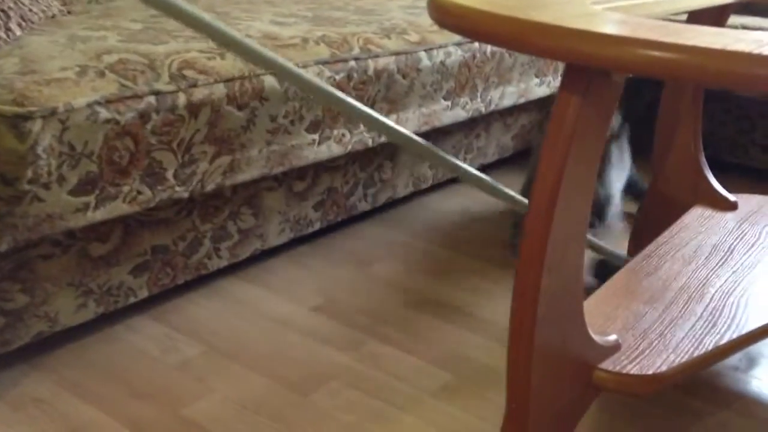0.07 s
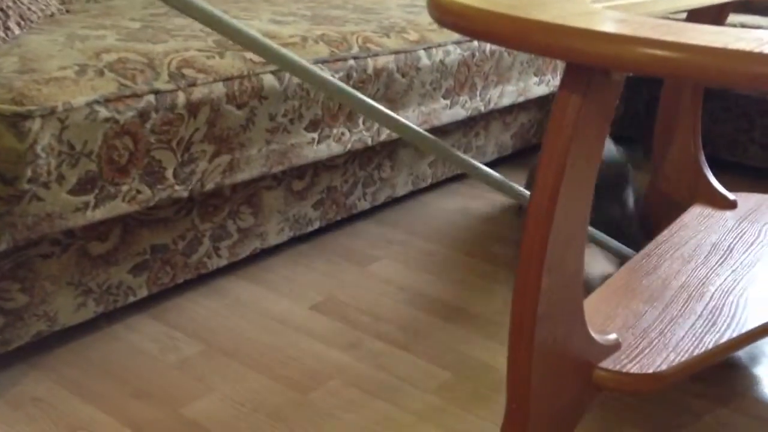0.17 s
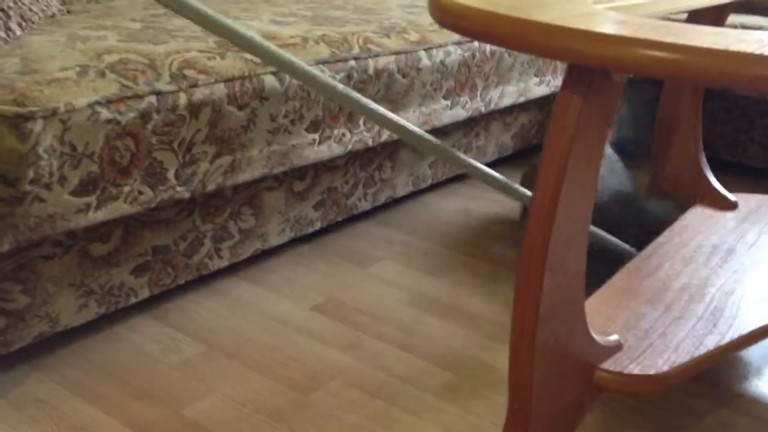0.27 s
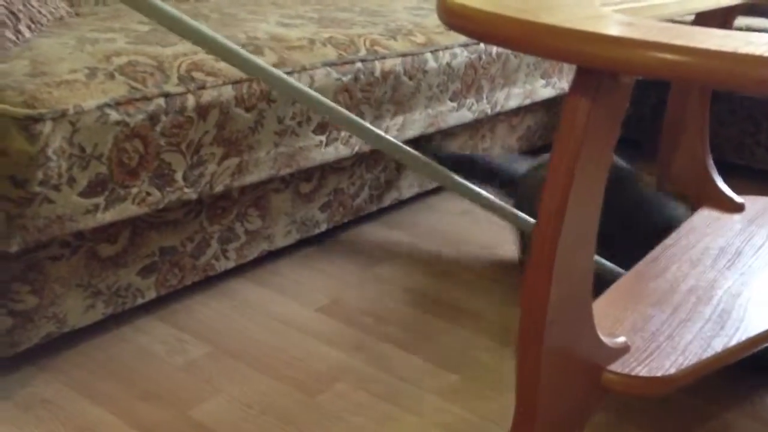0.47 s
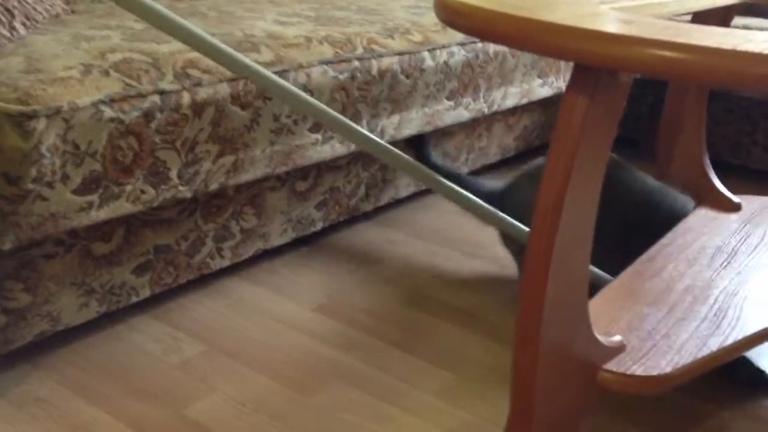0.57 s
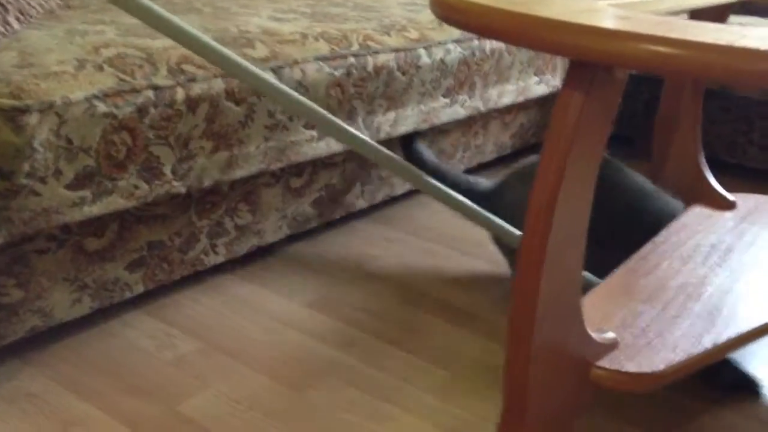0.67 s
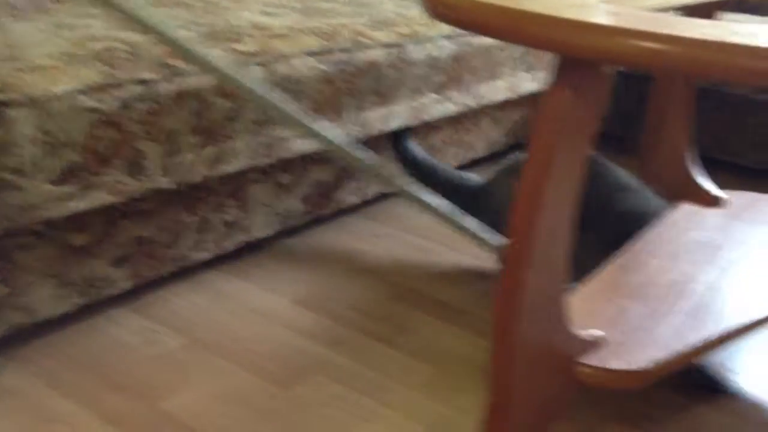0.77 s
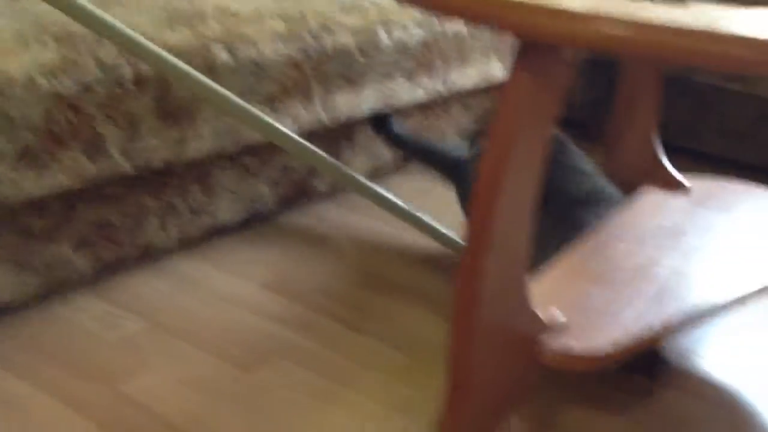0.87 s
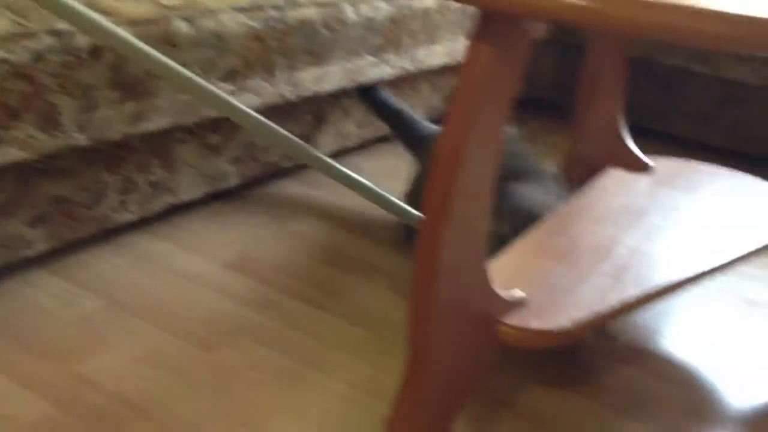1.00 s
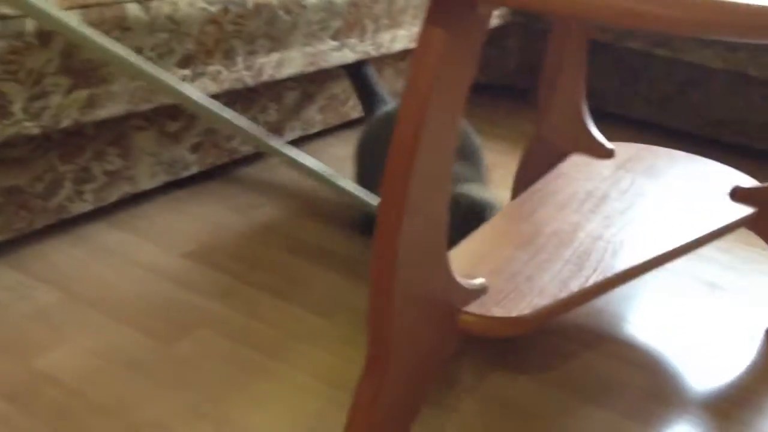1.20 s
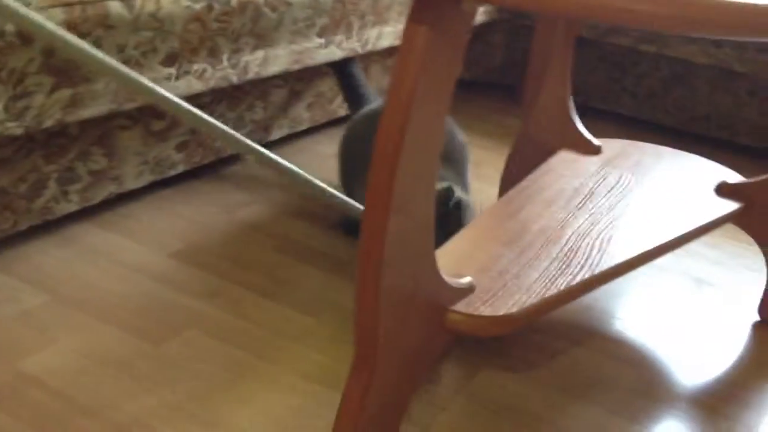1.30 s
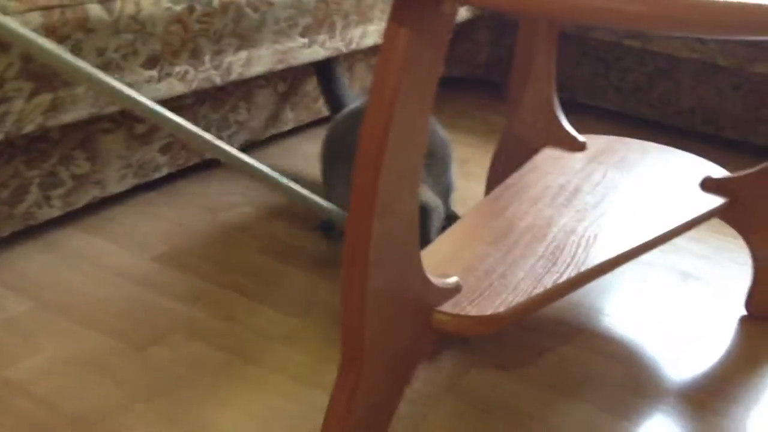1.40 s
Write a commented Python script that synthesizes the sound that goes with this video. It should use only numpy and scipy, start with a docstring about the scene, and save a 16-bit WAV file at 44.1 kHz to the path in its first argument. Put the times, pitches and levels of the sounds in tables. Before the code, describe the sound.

A cat hisses and growls in a living room. Soft bumps on wooden furniture and paw scuffs come in the first 0.4 seconds, with two quick spits around 0.25 and 0.35. The hiss peaks near 0.5 seconds, then darkens into a quieter, rough, wavering growl from 0.6 until about 1.4. Claws tick lightly on the hard floor around 1 second. The room adds a short echo.

```python
"""Soft bumps and paw scuffs come first, as a cornered cat turns against living room furniture.
It spits twice as its breath builds into a hiss: air rushing through the open mouth.
The voice joins in, the mouth closes, and uneven pulses of the vocal folds make a rough growl.
Claws tick on the hard floor. The room adds a short echo and a faint background noise."""
import sys
import numpy as np
from scipy import signal
from scipy.fft import rfft, irfft
from scipy.io import wavfile
from scipy.ndimage import uniform_filter1d

SR = 44100
rng = np.random.default_rng(int(sys.argv[2]) if len(sys.argv) > 2 else 0)


def waveform_to_disk(signal):
    """Save audio, clipped to [-1, 1], as 16-bit WAV at the path in sys.argv[1]."""
    frames = np.transpose(np.atleast_2d(signal))
    scaled = np.clip(frames, -1, 1) * 32767
    samples = np.round(scaled).astype(np.int16)
    wavfile.write(sys.argv[1], SR, samples)


N = 63945
T = np.arange(N) / SR

# the body bumps the furniture and paws land (time [s], level [dB], decay [s])
BUMPS = [(0.013, -58, 0.017), (.07, -59, 0.022), (0.141, -49.5, 0.033), (.165, -44.5, .01),
         (0.234, -32.5, 0.045), (0.26, -20.5, .018), (0.276, -24.5, 0.037), (0.31, -23, 0.032),
         (.338, -27, 0.0087), (.376, -24.5, 0.006), (0.394, -33, 0.011), (0.936, -52.5, 0.034),
         (0.977, -52, .03)]
# tone colour of a thud: how strong its lows and highs are (frequency [Hz], level [dB])
BUMP_COLOUR = [(30, -62), (95, -31), (135, 0.5), (210, -5.5), (270, -8), (370, -16), (600, -18),
               (1200, -24), (2500, -27), (8000, -52.5)]
# ringing notes of the furniture (frequency [Hz], level [dB], time to fade by 60 dB [s])
WOOD_NOTES = [(138.8, -6, 0.23), (180, -6.5, 0.078), (212, -15, 0.26), (357, -4.5, 0.074)]
# paws scuff the floor (time [s], level [dB], rise [s], decay [s])
SCUFFS = [(0.142, -53, 0.00067, 0.022), (.176, -33, 0.00068, 0.02), (.232, -34, 0.0013, 0.037),
          (.311, -30.5, 0.0029, 0.015), (.345, -30.5, 0.012, 0.027), (0.531, -43, 0.0067, 0.018),
          (.785, -49, .01, 0.07), (0.921, -47, 0.02, 0.017)]
# tone colour of a scuff (frequency [Hz], level [dB])
SCUFF_COLOUR = [(200, -11), (700, -8.5), (1100, 6.5), (1500, -4), (2500, -1), (5500, -3.5), (8500, -27),
                (13000, -23.5), (16000, -33)]

OPEN_HZ = 2491  # resonance of the open mouth: the frequency it rings at
RATTLE_HZ, GROWL_RATTLE_DB, HISS_RATTLE_DB = 88.5, 2.5, 1.5  # speed and depth of uneven surges of air
# breath of the hiss (time [s], level [dB], mouth resonance [Hz])
HISS = [(.12, -85, 2400), (.18, -41.5, 2280), (.235, -33.5, 2650), (.28, -27, 2500), (.33, -34.5, 2680),
        (.385, -22, 2315), (.416, -26.5, 2630), (.436, -15.5, 2640), (.462, -15.5, 2430),
        (.482, -23.5, 2224), (.505, -16.5, 2330), (.53, -18, 2140), (.55, -17, 1963), (.575, -23, 1830),
        (.607, -24.5, 1600), (.64, -46, 1450), (.72, -44, 1370), (.8, -90, 1330)]
# tone colour of the hiss with the mouth at OPEN_HZ (frequency [Hz], level [dB])
HISS_COLOUR = [(200, -29.5), (750, -30.5), (1050, -23.5), (1400, -19), (1720, -22.5), (2000, -5),
               (2380, -2), (2850, -4), (3300, -13), (4000, -22.5), (4900, -22), (7000, -39), (8300, -39),
               (9500, -51), (16000, -51)]
# high hiss resonances (open-mouth frequency [Hz], shift with the mouth [Hz/Hz], width [Hz], level [dB])
HISS_HIGHS = [(5650, 0.056, 1150, -22.5), (7950, 1, 630, -29.5)]
# how much of the hiss is voice (time [s], share [0-1])
VOICE_SHARE = [(.42, .02), (.465, .4), (.49, .88), (.52, .88), (.545, .5), (.62, .35)]
# how fast the vocal folds vibrate (time [s], pitch [Hz])
PITCH = [(.44, 317.7), (.48, 317.7), (.522, 328.1), (.555, 298.1), (.59, 302), (.635, 360.3), (.7, 347.1),
         (.76, 335), (.84, 315.5), (.9, 314.8), (.95, 338.5), (1.06, 341.4), (1.13, 329.4), (1.21, 327.6),
         (1.27, 340), (1.35, 309.8), (1.45, 306.9)]
JITTER_HZ = 110  # speed of the random wobble in pitch
# two spits (time [s], level [dB], rise [s], hold [s], decay [s], mouth resonance [Hz])
SPITS = [(0.244, -21, 0.009, .042, 0.0038, 2870), (.34, -18, 0.019, .01, 0.0083, 2600)]
# tone colour of a spit with the mouth at OPEN_HZ (frequency [Hz], level [dB])
SPIT_COLOUR = [(300, -15.5), (1450, -18.5), (1850, -5.5), (2250, -0.5), (2900, 1.5), (3600, -11.5),
               (4700, -15), (5700, -18.5), (7500, -39), (9500, -38), (14000, -42)]
# the voice's two lowest tones (time [s], level at the pitch [dB], level an octave up [dB])
LOW_TONES = [(.42, -86, -59), (.46, -63, -44.5), (.52, -47.5, -38.5), (.56, -52, -43.5), (.62, -59, -63),
             (.67, -63, -54), (.73, -48.5, -76), (.79, -63.5, -63), (.89, -57.5, -54), (.975, -47.5, -92),
             (1.02, -60.5, -57.5), (1.12, -57, -60), (1.28, -56.5, -56), (1.45, -48.5, -47)]
# a second way the folds vibrate, near the octave (time [s], frequency [Hz], level [dB])
SECOND_VIBRATION = [(1.04, 735, -60), (1.095, 738, -51), (1.13, 751.2, -53), (1.22, 714, -59),
                    (1.27, 742, -63), (1.34, 690, -72), (1.45, 684, -56)]

# effort of the growl (time [s], level [dB], mouth resonance [Hz])
GROWL = [(.56, -28.5, 1578), (.61, -29, 1338), (.7, -38, 1409), (.765, -43, 1345), (.85, -42, 1360),
         (.895, -42.5, 1254), (.905, -43.5, 988), (.922, -33.5, 998), (.99, -35.5, 1219),
         (1.018, -46, 1182), (1.06, -39, 1304), (1.11, -33, 1187), (1.16, -37, 1317), (1.188, -41.5, 1218),
         (1.235, -38.5, 1370), (1.278, -32.5, 1412), (1.325, -37, 1205), (1.375, -45, 1137),
         (1.4, -39, 1260), (1.45, -38.5, 1296)]
# resonance of the nose (time [s], frequency [Hz], level relative to the mouth [dB])
NOSE = [(.7, 5300, -45), (.9, 5300, -29), (.94, 5570, -22), (1.02, 5636, -18), (1.11, 4960, -22.5),
        (1.2, 4900, -23), (1.27, 4404, -17), (1.34, 4700, -25), (1.45, 4720, -23)]
# throat resonances that stay put (frequency [Hz], width [Hz], level [dB])
THROAT = [(693, 310, -49), (1100, 510, -14), (2034, 600, -12.5), (9500, 900, -46)]
# throat resonances that slide (multiple of the mouth resonance [ratio], width [Hz], level [dB])
SLIDING_THROAT = [(1.565, 240, -14)]
# tone colour of air leaking past the resonances (frequency [Hz], level [dB])
LEAK_COLOUR = [(150, -10), (500, -11), (1600, -4), (3300, -4), (6500, -10), (8500, -17), (15500, -23.5)]
LEAK_DB, LEAK_FOLLOW = -50, .61  # level at full effort, share of the effort's dB changes it follows
# claws hit the floor (time [s], level [dB], decay [s], ring frequency [Hz])
TICKS = [(0.9326, -41, 0.0015, 3700), (0.964, -31, 0.0015, 4760), (0.9764, -46, .003, 4550),
         (1.0314, -42, 0.0087, 3220), (1.066, -41.5, 0.0057, 2919)]
# tone colour of a claw's crack (frequency [Hz], level [dB])
TICK_COLOUR = [(500, -15), (2500, 2), (3400, -6), (5200, -6), (7000, -8), (15000, -18.5)]

# how long the room rings on (frequency [Hz], time to fade by 60 dB [s])
ROOM_FADE = [(150, 0.36), (1000, 0.48), (3000, 0.34), (12000, 0.31)]
# echoes off floor, table and sofa (delay [s], gain [ratio])
ECHOES = [(.0031, -0.13), (.0058, 0.16), (.0094, -0.067), (0.0133, -0.11)]
# tone colour of the room's background noise (frequency [Hz], level [dB])
BACKGROUND_COLOUR = [(25, -59), (85, -38), (140, 0.5), (240, 2.5), (350, 4), (520, -12), (1000, -13.5),
                     (2200, -16.5), (5000, -8.5), (8000, -18.5), (15500, -19.5)]
TAIL_DB, BACKGROUND_DB = -6.5, -61.5
LOW_CUT_HZ, HIGH_CUT_HZ, BASS_LEAK_DB = 121, 15450, -14


def amp(db):
    """Turns decibels into a gain to multiply by."""
    return 10 ** (np.asarray(db) / 20)


def unit(x):
    """Scales a signal to an average strength (rms) of 1."""
    return x / np.sqrt(np.mean(x ** 2) + 1e-20)


def steady(x, size=900):
    """Keeps the strength near 1 all along, averaging over `size` samples."""
    power = uniform_filter1d(uniform_filter1d(x ** 2, size), size)
    return x / np.sqrt(abs(power) + 1e-14)


def curves(rows):
    """Joins the rows of a time table with straight lines, one curve per column."""
    times, *columns = np.transpose(rows)
    return [np.interp(T, times, column) for column in columns]


def look_up(table, hz):
    """Reads between the rows of a frequency table, on a log scale."""
    frequencies, values = np.transpose(table)
    return np.interp(np.log(hz + 1), np.log(frequencies + 1), values)


def add(mix, start, sound):
    """Mixes a sound in at a start time in seconds."""
    part = mix[max(round(start * SR), 0):][:len(sound)]
    part += sound[:len(part)]


def colour(x, table):
    """Gives a signal the tone colour in a table."""
    gain = amp(look_up(table, np.fft.rfftfreq(2 * N, 1 / SR)))
    return irfft(rfft(x, 2 * N) * gain)[:N]


def noise(table):
    """Noise of strength 1 with the given tone colour."""
    return unit(colour(rng.standard_normal(N), table))


def wander(hz):
    """A random wobble, with speeds up to about `hz`."""
    keep_slow = np.exp(-(np.fft.rfftfreq(N, 1 / SR) / hz) ** 2)
    return unit(irfft(rfft(rng.standard_normal(N)) * keep_slow, N))


def resonate(x, hz, width):
    """Lets through a band `width` Hz wide around a frequency that may move."""
    spin = np.exp(2j * np.pi * np.cumsum(hz * np.ones(N)) / SR)
    r = np.exp(-np.pi * width / SR)
    # shift the band down to 0 Hz, smooth it, shift it back
    smoothed = signal.lfilter([(1 - r) ** 2], [1, -2 * r, r * r], x / spin)
    return 2 * (spin * smoothed).real


def strike(rise, decay, hold=0):
    """A loudness shape that rises, holds and dies away; times in seconds."""
    return np.minimum(T / rise, 1) * np.exp(-np.maximum(T - rise - hold, 0) / decay)


def bumps():
    """Each soft blow makes a dull thud and sets the wood ringing briefly."""
    out = np.zeros(N)
    ring = sum(amp(db - 60 * T / fade) * np.sin(2 * np.pi * hz * T) for hz, db, fade in WOOD_NOTES)
    for start, db, decay in BUMPS:
        thud = steady(noise(BUMP_COLOUR), size=400) * strike(rise=.0027, decay=decay)
        add(out, start, amp(db) * (thud + ring))
    return out


def paw_scuffs():
    """Paws rub the floor in short bursts of grainy noise."""
    out = np.zeros(N)
    for start, db, rise, decay in SCUFFS:
        grainy = unit(noise(SCUFF_COLOUR) * amp(3.4 * wander(hz=540)))
        add(out, start, amp(db) * grainy * strike(rise, decay))
    return out


def count_cycles(hz, jitter, speed=JITTER_HZ):
    """Counts the cycles of a vibration whose pitch wobbles by the fraction `jitter`."""
    return np.cumsum(hz * (1 + jitter * wander(speed))) / SR


def vocal_folds(jitter, air_share):
    """The folds open once a cycle, giving a buzzy pulse and a puff of air."""
    cycles = count_cycles(curves(PITCH)[0], jitter)
    # harmonics (multiples of the pitch) from the third up; k * k smears each pulse over its cycle
    pulses = unit(sum(np.cos(2 * np.pi * (k * cycles + k * k / 36)) for k in range(3, 36)))
    puff_shape = .5 + np.exp(-(cycles % 1) / .45)
    puffs = unit(puff_shape * rng.standard_normal(N))
    return np.sqrt(1 - air_share) * pulses + np.sqrt(air_share) * puffs


def hiss():
    """Air, joined by the voice, rushes through the mouth and sounds darker as it closes."""
    level, mouth_hz = curves(HISS)
    share = curves(VOICE_SHARE)[0]
    voice = vocal_folds(jitter=.007, air_share=.03)
    breath = np.sqrt(1 - share) * rng.standard_normal(N) + np.sqrt(share) * voice
    # colour each short slice to suit the mouth at that moment
    hz, times, slices = signal.stft(breath, SR, nperseg=512, noverlap=384)
    gain = amp(look_up(HISS_COLOUR, hz[:, None] * OPEN_HZ / np.interp(times, T, mouth_hz)))
    air = signal.istft(slices * gain, SR, nperseg=512, noverlap=384)[1][:N]
    for high_hz, shift, width, db in HISS_HIGHS:
        air += amp(db) * resonate(rng.standard_normal(N), high_hz + shift * (mouth_hz - OPEN_HZ), width)
    rattle = amp(HISS_RATTLE_DB * wander(RATTLE_HZ))
    return amp(level) * steady(air * rattle, size=600)


def spits():
    """Two sudden puffs of air burst from the open mouth before the hiss peaks."""
    out = np.zeros(N)
    for start, db, rise, hold, decay, mouth_hz in SPITS:
        air = noise([(hz * mouth_hz / OPEN_HZ, level) for hz, level in SPIT_COLOUR])
        rattle = amp(HISS_RATTLE_DB * wander(RATTLE_HZ))
        add(out, start, amp(db) * steady(air * rattle, size=500) * strike(rise, decay, hold))
    return out


def moan():
    """The folds hum two clear low tones; later a second vibration splits the upper one."""
    cycles = count_cycles(curves(PITCH)[0], jitter=.0217)
    tones = sum(amp(db + 2.3 * wander(hz=50)) * np.sin(2 * np.pi * k * cycles)
                for k, db in enumerate(curves(LOW_TONES), 1))
    split_hz, split_db = curves(SECOND_VIBRATION)
    split = amp(split_db) * np.sin(2 * np.pi * count_cycles(split_hz, jitter=.015))
    return np.sqrt(2) * (tones * (T > LOW_TONES[0][0]) + split * (T > SECOND_VIBRATION[0][0]))


def growl():
    """Uneven, rattling pulses from the folds ring the mouth, nose and throat; some air leaks past."""
    level, mouth_hz = curves(GROWL)
    nose_hz, nose_db = curves(NOSE)
    rattle = amp(GROWL_RATTLE_DB * wander(RATTLE_HZ))
    buzz = vocal_folds(jitter=.022, air_share=.5) * rattle
    voice = resonate(buzz, mouth_hz, width=457)
    voice += amp(nose_db) * resonate(buzz, nose_hz, width=600)
    voice += sum(amp(db) * resonate(buzz, hz, width) for hz, width, db in THROAT)
    voice += sum(amp(db) * resonate(buzz, ratio * mouth_hz, width) for ratio, width, db in SLIDING_THROAT)
    # the narrow centre of the mouth resonance almost whistles
    whistle = unit(np.sin(2 * np.pi * count_cycles(mouth_hz, jitter=.018, speed=120)) * rattle)
    voice = amp(level) * steady(steady(voice) + amp(-1) * whistle)
    leak = amp(LEAK_DB + LEAK_FOLLOW * (level - level.max())) * unit(colour(buzz, LEAK_COLOUR))
    return (voice + leak) * (T > GROWL[0][0])


def claw_ticks():
    """A claw hits the hard floor with a tiny crack and a high ring."""
    out = np.zeros(N)
    for start, db, decay, hz in TICKS:
        ring = steady(resonate(rng.standard_normal(N), hz, width=1800), size=200)
        crack = amp(-5) * noise(TICK_COLOUR)
        add(out, start, amp(db) * (ring + crack) * strike(rise=.0012, decay=decay))
    return out


def room(x, gap=22, count=1200):
    """Nearby surfaces send back a few echoes; many more, about `gap` samples apart, blur into a tail."""
    bounces = np.zeros(gap * (count + 12))
    arrivals = gap * (np.arange(count) + 10) + rng.integers(0, gap, count)
    bounces[arrivals] = rng.choice([-1., 1.], count)
    hz, times, slices = signal.stft(bounces, SR, nperseg=256)
    fade = amp(-60 * times / look_up(ROOM_FADE, hz)[:, None])
    tail = signal.istft(slices * fade, SR, nperseg=256)[1]
    response = amp(TAIL_DB) * tail / np.linalg.norm(tail)
    response[0] += 1  # the sound that arrives directly
    for delay, gain in ECHOES:
        response[round(delay * SR)] += gain
    return signal.fftconvolve(x, response / np.linalg.norm(response))[:N]


def scene():
    """The cat and its movements sound in the room, over faint background noise."""
    sounds = bumps() + paw_scuffs() + hiss() + spits() + moan() + growl() + claw_ticks()
    return (room(sounds) + amp(BACKGROUND_DB) * noise(BACKGROUND_COLOUR))[None]


def record(dry):
    """The microphone thins out the bass, and the very highest treble is cut off."""
    low_cut = signal.butter(4, LOW_CUT_HZ, "high", fs=SR, output="sos")
    thin = signal.sosfilt(low_cut, dry) + amp(BASS_LEAK_DB) * dry
    high_cut = signal.firwin(1023, HIGH_CUT_HZ, window=("kaiser", 9), fs=SR)
    return signal.oaconvolve(thin, high_cut[None], "same")


dry = scene()
out = record(dry)
waveform_to_disk(out)
```